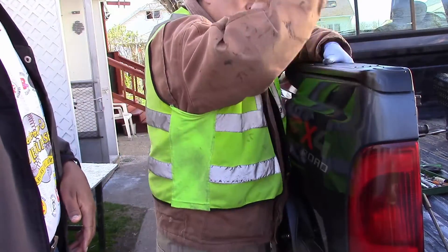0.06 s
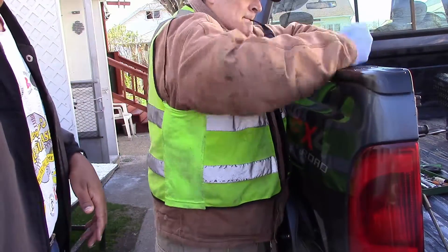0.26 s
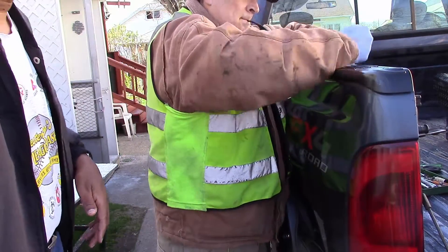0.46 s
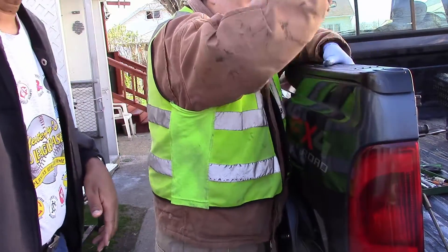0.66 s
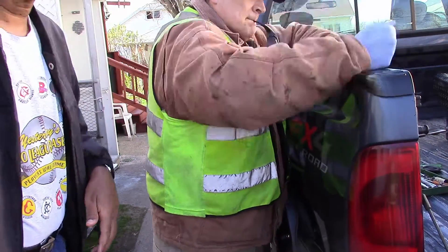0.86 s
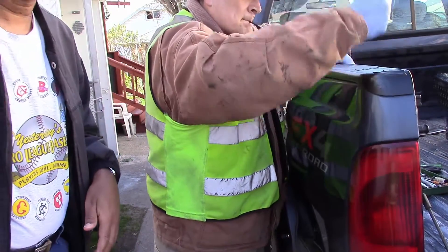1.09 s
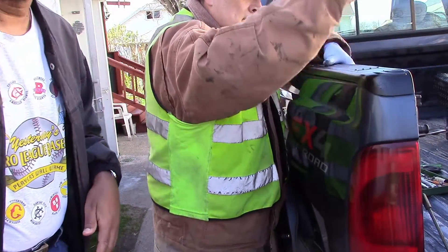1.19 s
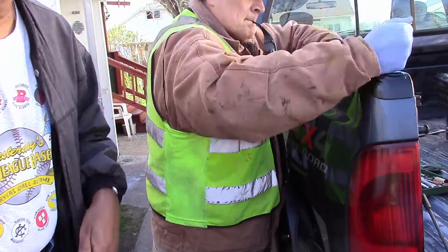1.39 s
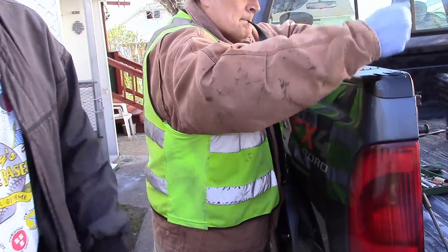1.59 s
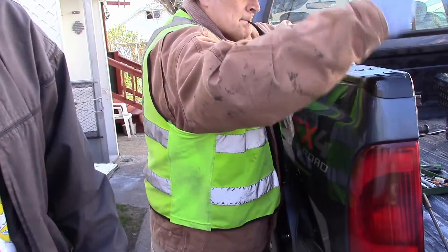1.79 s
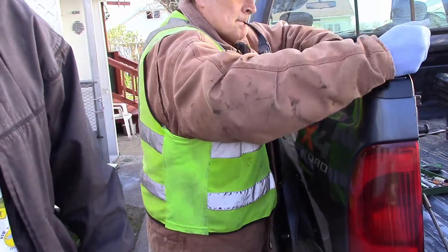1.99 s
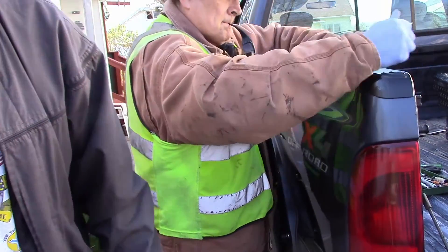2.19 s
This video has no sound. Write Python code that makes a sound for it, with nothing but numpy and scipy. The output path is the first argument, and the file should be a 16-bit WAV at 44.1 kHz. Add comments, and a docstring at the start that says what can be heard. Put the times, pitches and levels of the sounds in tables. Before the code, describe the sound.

A gloved fist pounds a plastic cap onto a pickup bed rail four times, close by in a yard. Each blow cracks and booms through the steel panel, with brief rattles and tiny clinks over a faint machine hum.

```python
"""A yard, close to a pickup bed. A machine hums; a jacket rustles, a faint squeak fades, and a plastic
cap ticks under one hand. A gloved fist then pounds the cap onto the bed rail four times. At each blow
the plastic cracks, the steel side panel booms and a limiter ducks the level. The panel rattles as it
swings back from the first three; a loose metal part clinks after all four. The jacket swishes last."""
import sys
import numpy as np
from scipy import signal
from scipy.fft import rfft, irfft, next_fast_len
from scipy.io import wavfile
from scipy.ndimage import minimum_filter1d, map_coordinates

SR = 44100
rng = np.random.default_rng(int(sys.argv[2]) if len(sys.argv) > 2 else 0)


def waveform_to_disk(signal):
    """Save audio, clipped to [-1, 1], as 16-bit WAV at the path in sys.argv[1]."""
    frames = np.transpose(np.atleast_2d(signal))
    scaled = np.clip(frames, -1, 1) * 32767
    samples = np.round(scaled).astype(np.int16)
    wavfile.write(sys.argv[1], SR, samples)


N = 99225

# Fist blows: start_s, level_db, touch_db, slap_db, seat_s (delay until the cap bottoms out),
# boom_hz, boom_db, clack_hz, clack_db, bass_db, treble_db, t60_factor
BLOWS = [(0.2321, 0.5, -8, 0.5, 0.00706, 359, 7, 2280, 2.5, -8, -1.5, 0.99),
         (0.8224, -1, 0, -3.5, 0.0036, 412, 2.5, 2900, 0.5, -1.5, -1.5, 1.0),
         (1.3575, -1.5, -3.5, 1.5, 0.00393, 556, 1, 1627, 6.5, -5, 6.5, 0.97),
         (1.8440, -3.5, -4.5, -3.5, .002, 744, 5, 2280, 3.5, 7, -5, 0.63)]


def amp(db):
    """Decibels to gain."""
    return 10 ** (np.asarray(db) / 20)


def along(points, hz):
    """Interpolate (hz, value) points on a log axis."""
    knots_hz, values = np.transpose(points)
    return np.interp(np.log(hz + 1), np.log(knots_hz + 1), values)


def bump(hz, centre_hz, octaves):
    """Bell of height 1 on the log-frequency axis."""
    return np.exp(-.5 * (np.log2((hz + 1) / centre_hz) / octaves) ** 2)


def wobble(rate_hz):
    """Smooth random curve with knots at rate_hz."""
    return map_coordinates(rng.standard_normal(int(N * rate_hz / SR) + 4), [np.arange(N) * rate_hz / SR])


def noise(base_db, extra_db=lambda hz: 0 * hz, width_db=0, size=SR):
    """Nearly mono noise: base colour at rms 1, extra colour on top; width_db lifts the side signal."""
    # Side over mid, before width_db: freq_hz, gain_db
    side_spectrum = [(30, 9), (80, -42), (400, -38.5), (1200, -27.5), (2800, -20.5), (5000, -17),
                     (14000, -22)]
    hz = np.fft.rfftfreq(size, 1 / SR)
    gain = amp(base_db(hz))
    gain = gain / np.sqrt(np.mean(gain ** 2)) * amp(extra_db(hz))
    side_gain = gain * amp(width_db + along(side_spectrum, hz))
    mid, side = irfft(rfft(rng.standard_normal((2, size))) * [gain, side_gain], size)
    return np.array([mid + side, mid - side])


def add(out, start_s, sound):
    """Mix a sound in at start_s."""
    part = out[:, round(start_s * SR):][:, :sound.shape[-1]]
    part += sound[..., :part.shape[1]]


def decay(t, t60_s):
    """Fall of 60 dB per t60_s."""
    return np.exp(-np.log(1000) * t / t60_s)


def burst(t, t60_s, rise_s=0.00017):
    """Exponential rise and decay."""
    return (1 - np.exp(-t / rise_s)) * decay(t, t60_s)


def ring(t, hz, t60_s):
    """Vibration builds up, slowest in the bass, then dies away."""
    return burst(t, t60_s, rise_s=0.018 + 1.56 / hz)


def background():
    """Outdoor air and a wavering machine hum."""
    # Hum partials: pitch_hz, level_db
    partials = [(86, -55), (103, -44.5), (117, -49.5), (128, -64)]
    # Air spectrum: freq_hz, gain_db
    air = [(20, -62), (40, -42), (63, -4.5), (110, -2.5), (170, -6.5), (320, -13), (550, -16),
           (1500, -24.5), (3300, -34.5), (4200, -37), (10000, -44), (16000, -73)]
    t = np.arange(N) / SR
    hum = np.zeros(N)
    for hz, db in partials:
        waver = 1 + 0.37 * wobble(34)
        drift_rad = 0.55 * wobble(7.74)
        hum += amp(db) * np.sqrt(2) * waver * np.sin(2 * np.pi * hz * t + drift_rad)
    return hum + amp(-43.5) * noise(lambda hz: along(air, hz), width_db=9, size=N)


def jacket():
    """Cloth swishes as the arms and body move: dull rub, thin hiss."""
    # Swishes: centre_s, half_width_s, rub_db, hiss_db
    swishes = [(0.05, 0.15, -56.5, -65), (0.67, 0.063, -50, -74.5), (1.8, 0.089, -51, -53.5),
               (2.127, 0.015, -41, -69), (2.196, 0.066, -44, -55)]
    # Cloth spectra: freq_hz, gain_db
    rub_spectrum = [(150, 5), (600, 7.5), (1500, 6), (2700, -6), (3500, 0), (4800, -36), (9000, -26),
                    (15000, -40)]
    hiss_spectrum = [(1000, -13), (4000, -1), (8500, 0), (12000, -7.5), (16000, -14)]
    t = np.arange(N) / SR
    centre_s, half_width_s, rub_db, hiss_db = np.transpose(swishes)
    motion = np.exp(-((t - centre_s[:, None]) / half_width_s[:, None]) ** 2)
    rub = amp(rub_db) @ motion * noise(lambda hz: along(rub_spectrum, hz), size=N)
    hiss = amp(hiss_db) @ motion * noise(lambda hz: along(hiss_spectrum, hz), size=N)
    return amp(1.7 * wobble(90)) * (rub + hiss)


def squeak():
    """Faint, thin, unsteady tone before the first blow."""
    centre_s, half_width_s, pitch_hz = 0.03, 0.12, 3470
    t = np.arange(N) / SR
    swell = np.exp(-((t - centre_s) / half_width_s) ** 2)
    return amp(-56) * swell * np.sin(2 * np.pi * pitch_hz * t + 1.5 * wobble(254))


def cap_ticks():
    """The cap ticks and scuffs as it shifts."""
    # Ticks: start_s, level_db, t60_s, low_shelf_db
    ticks = [(0.0777, -33.5, 0.0099, 11.5), (0.1883, -45, 0.048, 15), (0.192, -39, 0.055, 9),
             (0.2167, -51, 0.052, 12), (0.223, -47, 0.038, 6), (0.545, -44.5, 0.028, 2),
             (0.584, -40.5, 0.012, 14.5), (0.978, -41.5, 0.06, 17.5), (1.058, -43, 0.018, -14),
             (1.194, -43, .08, -36), (1.58, -44, 0.029, -10), (1.591, -43.5, 0.022, 12),
             (1.635, -34, 0.027, -3), (1.672, -42.5, 0.012, 13)]
    # Tick spectrum: freq_hz, gain_db
    spectrum = [(200, -24), (700, -14), (1300, -5), (1800, -7), (2500, 1), (4000, -8), (5800, 0),
                (8500, -7), (15000, -16)]
    shelf_hz = 3630
    out, t = np.zeros((2, N)), np.arange(4096) / SR
    for start_s, db, t60_s, low_shelf_db in ticks:
        shelf = lambda hz: low_shelf_db / (1 + (hz / shelf_hz) ** 4)
        scuff = noise(lambda hz: along(spectrum, hz), shelf, size=len(t))
        add(out, start_s, amp(db) * burst(t, t60_s) * scuff)
    return out


def pounding():
    """The fist touches, the cap seats, panel and yard ring; the spot struck sets the colour."""
    # Spectra of the plastic's crack and the yard's reverberation: freq_hz, gain_db
    slap_spectrum = [(80, -39), (300, -29), (700, 4.5), (1400, 2.5), (3200, -5), (6000, -13.5),
                     (10000, -17), (16000, -33)]
    yard_spectrum = [(50, -7), (130, 12.5), (400, 1), (1000, -9), (3000, -19.5), (5000, -31.5),
                     (15000, -42.5)]
    seat_rise_s, seat_hold_s, bass_hz, treble_hz = 0.00033, 0.0053, 182, 2520
    out, t = np.zeros((2, N)), np.arange(SR) / SR
    for (start_s, db, touch_db, slap_db, seat_s,
         boom_hz, boom_db, clack_hz, clack_db, bass_db, treble_db, t60_factor) in BLOWS:
        spot_db = lambda hz: (boom_db * bump(hz, boom_hz, octaves=0.2)
                              + clack_db * bump(hz, clack_hz, octaves=0.094)
                              + bass_db / (1 + (hz / bass_hz) ** 2))
        steel_db = lambda hz: spot_db(hz) + treble_db * hz ** 2 / (hz ** 2 + treble_hz ** 2)
        touch = amp(touch_db) * decay(t, t60_s=0.029)
        seat = np.clip((t - seat_s) / seat_rise_s, 0, 1)
        seat *= decay(np.maximum(t - seat_s - seat_hold_s, 0), t60_s=0.093)
        crackle = amp(1.5 * wobble(1012)[:SR])
        plastic = noise(lambda hz: along(slap_spectrum, hz), spot_db, width_db=-4)
        slap = amp(slap_db - 4.5) * np.hypot(touch, seat) * crackle * plastic
        steel = panel(t, steel_db, t60_factor)
        reflections = noise(lambda hz: along(yard_spectrum, hz), width_db=5.5)
        yard = amp(-19.5) * ring(t, bass_hz, t60_s=1.23) * reflections
        add(out, start_s, amp(db) * (slap + steel + yard))
    return out


def panel(t, colour_db, t60_factor):
    """Steel side panel: a few strong modes over a dense mass of weaker ones."""
    # Strong modes: pitch_hz, level_db, base_t60_s
    strong_modes = [(153, -8, 0.63), (189.5, -1, 0.63), (219.7, -11, 0.42), (270.4, -20, 0.49),
                    (338.2, -2.5, 0.58), (356.6, 1.5, 0.38), (411, -8.5, 0.47), (480, 0, 0.42),
                    (559, -0.5, 0.29), (728, -3.5, 0.26), (970, -7.5, 0.44), (1347, -2, 0.47),
                    (1570, -9, 0.18), (1750, -2, 0.27)]
    # Dense ringing of the whole bed: freq_hz, gain_db
    bed_spectrum = [(30, -50), (55, -36), (85, -5.5), (165, -2), (350, 0), (700, -5), (1000, -7),
                    (1500, -7.5), (3300, -19), (5000, -28), (10000, -42), (16000, -58)]
    # Its decay: freq_hz, base_t60_s
    bed_t60 = [(100, 0.51), (400, 0.64), (1500, 0.31), (4000, .33), (12000, .33)]
    modes = mass = 0
    for hz, db, base_t60_s in strong_modes:
        gain = amp(db + colour_db(hz) + rng.normal(0, 1))
        tone = np.sin(2 * np.pi * (hz * t + rng.random()))
        modes += gain * ring(t, hz, base_t60_s * t60_factor) * tone
    dense = rfft(noise(lambda hz: along(bed_spectrum, hz), colour_db, width_db=1.5))
    centres_hz = np.geomspace(80, 12000, 8)
    bins_hz = np.fft.rfftfreq(SR, 1 / SR)
    for hz, weights in zip(centres_hz, np.eye(len(centres_hz))):
        band = irfft(dense * along(np.c_[centres_hz, weights], bins_hz), SR)
        mass += band * ring(t, hz, along(bed_t60, hz) * t60_factor)
    return amp(-15) * modes + amp(-2.5) * mass


def fist_thuds():
    """The padded fist gives each blow a short dull push."""
    out, t = np.zeros((2, N)), np.arange(SR) / SR
    push = burst(t, t60_s=0.12, rise_s=0.0071)
    for start_s, db, *_, bass_db, _, _ in BLOWS:
        thud = noise(lambda hz: 50 * bump(hz, centre_hz=201, octaves=2))
        add(out, start_s, amp(db + bass_db - 12) * push * thud)
    return out


def panel_rattles():
    """Short hollow knocks as the panel swings back."""
    # Knocks: start_s, level_db, centre_hz
    knocks = [(0.285, -12, 215), (0.872, -6, 405), (0.972, -24.5, 780), (1.012, -28.5, 790),
              (1.408, -14, 510), (1.43, -45, 1600)]
    out, t = np.zeros((2, N)), np.arange(SR) / SR
    for start_s, db, centre_hz in knocks:
        hollow = noise(lambda hz: 45 * bump(hz, centre_hz, octaves=0.82))
        add(out, start_s, amp(db) * ring(t, centre_hz, t60_s=0.24) * hollow)
    return out


def metal_clinks():
    """A small loose metal part clinks after the blows."""
    # Clinks: start_s, level_db
    clinks = [(0.4, -40), (0.427, -42.5), (0.469, -48), (0.895, -32.5), (0.949, -39), (0.97, -38),
              (0.996, -38), (1.021, -44), (1.524, -39), (1.929, -41)]
    out, t = np.zeros((2, N)), np.arange(4096) / SR
    for start_s, db in clinks:
        metal = noise(lambda hz: 17.5 * bump(hz, centre_hz=9530, octaves=0.047), size=len(t))
        add(out, start_s, amp(db) * burst(t, t60_s=0.015) * metal)
    return out


def scene():
    """All sources, the truck a touch to the right."""
    pan_db = 0.04
    truck = pounding() + fist_thuds() + panel_rattles() + cap_ticks() + metal_clinks()
    return truck * amp([[-pan_db], [pan_db]]) + squeak() + jacket() + background()


def record(dry):
    """Microphone low cut, fast limiter with hold and steady release, soft clip, high cut."""
    low_cut_hz, high_cut_hz, edge_hz, clip_level = 78, 15900, 350, 0.94
    threshold_db, attack_s, hold_s, release_db_per_s = -0.5, 0.0027, 0.0092, 146
    x = signal.sosfilt(signal.butter(2, low_cut_hz, "high", fs=SR, output="sos"), dry)
    peak_db = 20 * np.log10(np.abs(x).max(axis=0) + 1e-9)
    over_db = np.maximum(peak_db - threshold_db, 0)
    half_hold = int(hold_s * SR / 2)
    held_db = -minimum_filter1d(-over_db, 2 * half_hold + 1, origin=half_hold)
    ramp_db = release_db_per_s * np.arange(N) / SR
    duck_db = np.maximum.accumulate(held_db + ramp_db) - ramp_db
    pole = np.exp(-1 / (attack_s * SR))
    x = x * amp(-signal.lfilter([1 - pole], [1, -pole], duck_db))
    x = x / (1 + (x / clip_level) ** 12) ** (1 / 12)
    size = next_fast_len(N + SR // 2)
    high_cut = (1 - np.tanh((np.fft.rfftfreq(size, 1 / SR) - high_cut_hz) / edge_hz)) / 2
    return irfft(rfft(x, size) * high_cut, size)[:, :N]


dry = scene()
out = record(dry)
waveform_to_disk(out)
```